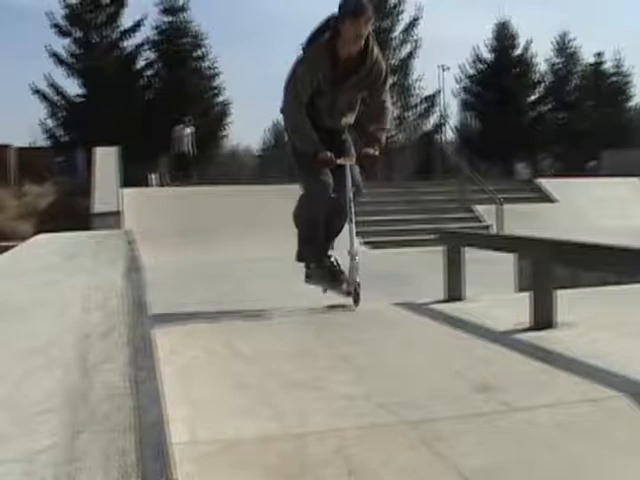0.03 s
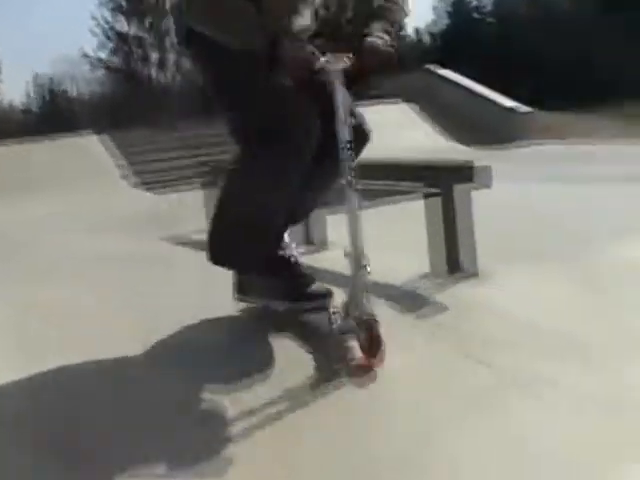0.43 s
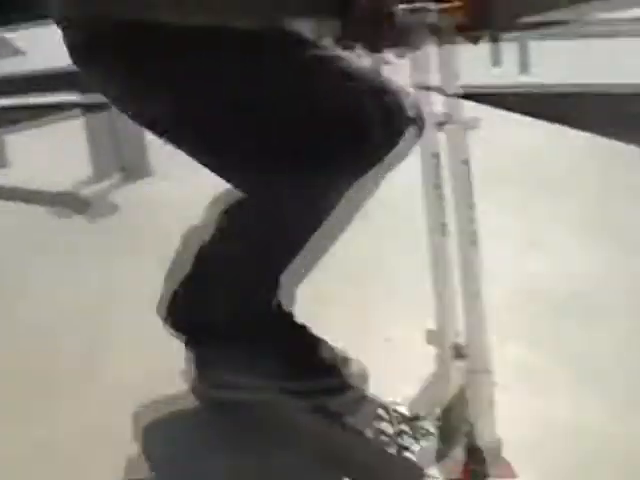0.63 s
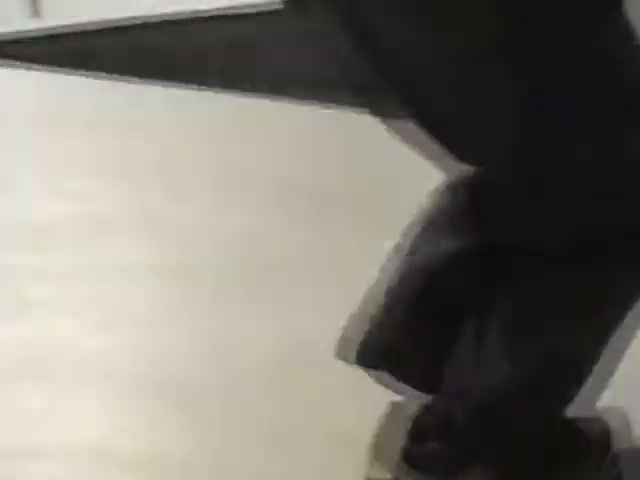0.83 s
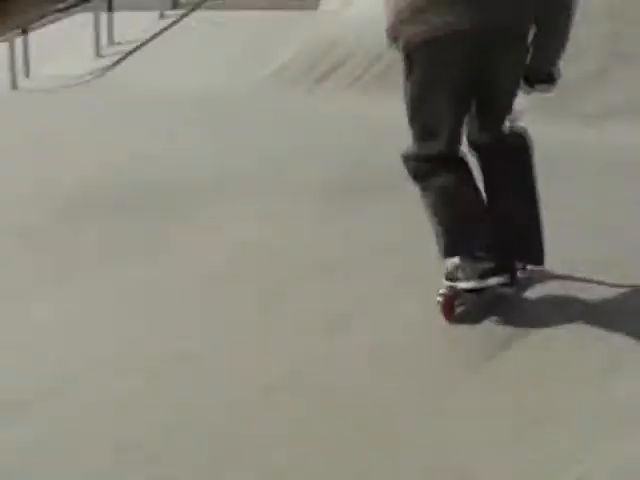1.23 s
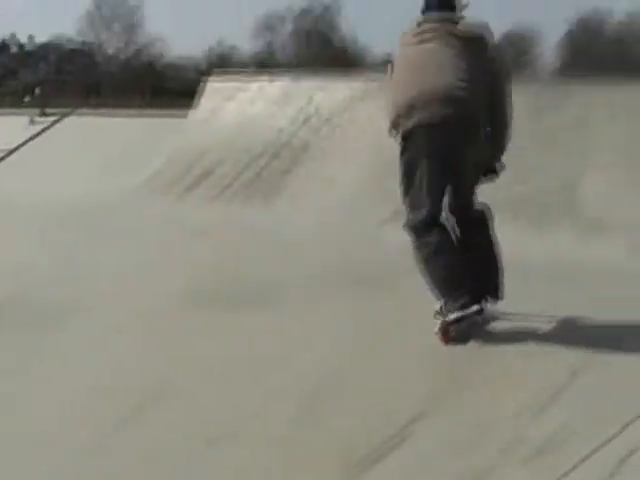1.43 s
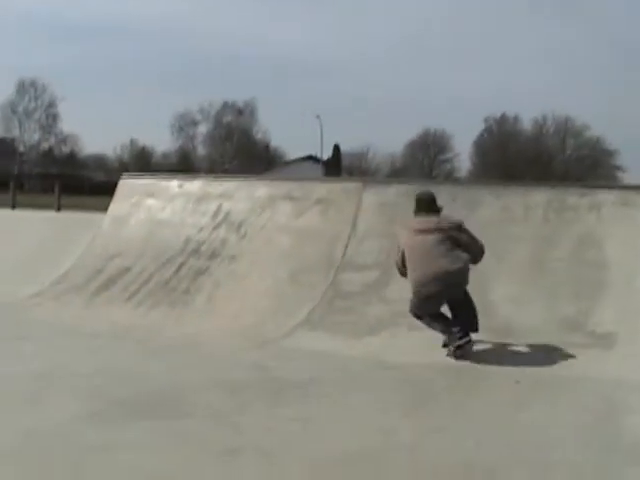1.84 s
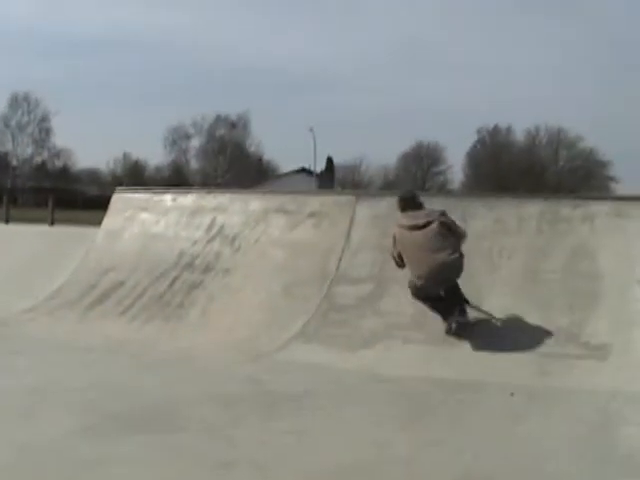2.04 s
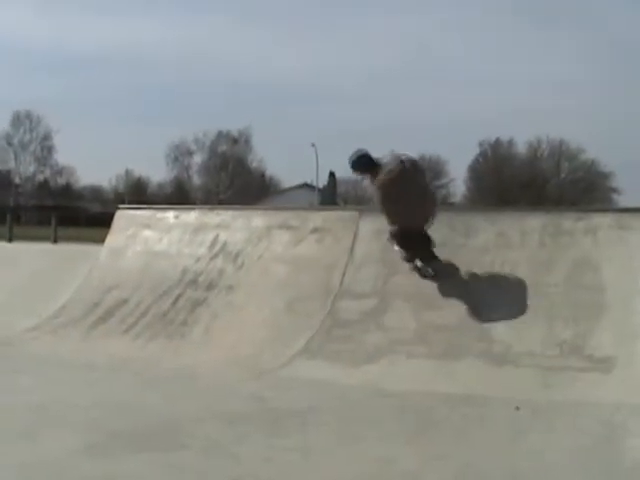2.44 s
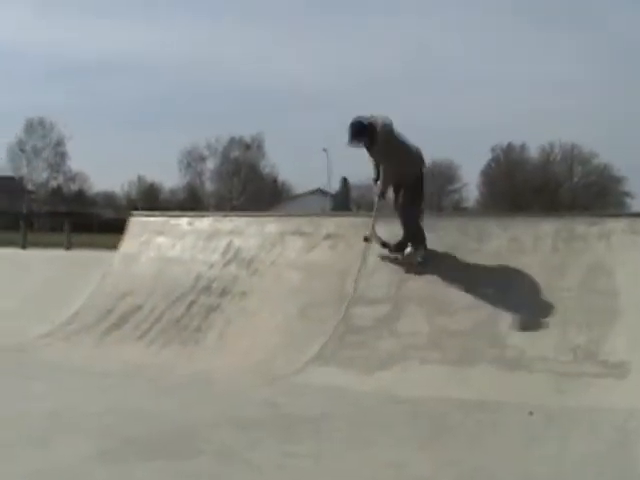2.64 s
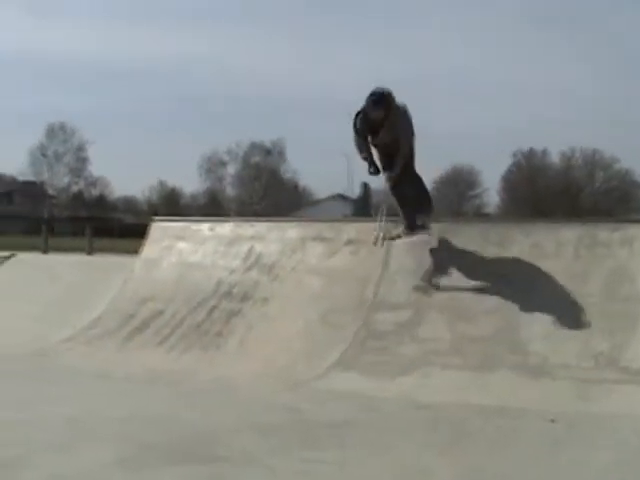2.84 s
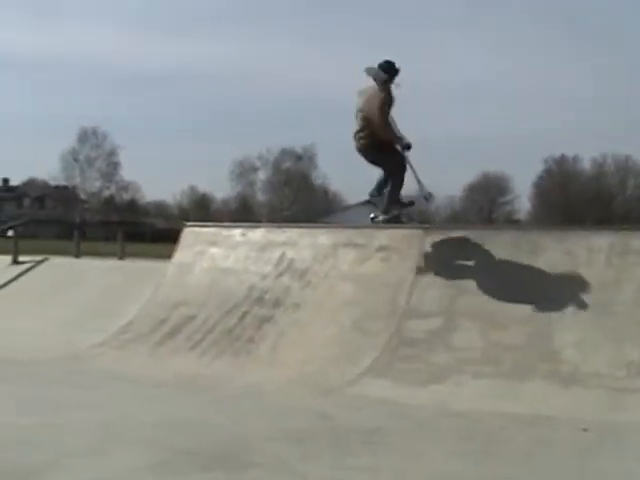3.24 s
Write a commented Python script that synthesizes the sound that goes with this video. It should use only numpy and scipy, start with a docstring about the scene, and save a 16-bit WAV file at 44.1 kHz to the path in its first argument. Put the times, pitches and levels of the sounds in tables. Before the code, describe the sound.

Hard scooter wheels approach and pass right by the microphone with rattles, scuffs and sharp knocks. The rolling dies away and a short metal clatter follows on a ramp, while gusty wind rumbles over faint outdoor skatepark hiss.

```python
"""A concrete skatepark, outdoors, with a stereo microphone standing in the wind.
A kick scooter rolls close past it, loose fittings rattling, hard wheels clacking across the joints.
It runs on up a ramp, clicks off the coping and lands on top with a metallic clatter.
Wind buffets the two microphone ports throughout, over a faint outdoor hiss."""
import sys
import numpy as np
from scipy import signal
from scipy.io import wavfile
from scipy.ndimage import uniform_filter1d

SR = 44100
rng = np.random.default_rng(int(sys.argv[2]) if len(sys.argv) > 2 else 0)


def unload_audio(sound):
    """Save the sound as a 16-bit wav file, at the path given as the first command line argument."""
    columns = np.transpose(np.atleast_2d(sound))
    # keep every value between -1 and 1, then stretch to whole-number steps
    steps = np.round(np.clip(columns, -1, 1) * 32767)
    wavfile.write(sys.argv[1], SR, steps.astype(np.int16))


N = 149940
T = np.arange(N) / SR

# the wheels as heard at the microphone: (time [s], level [dB])
ROLL_LEVEL = [(.17, -38), (.68, -33.5), (.76, -37.5), (.92, -30.5), (1.01, -42.5), (1.12, -41), (1.57, -32),
              (1.82, -43.5), (1.9, -30.5), (1.98, -32.5), (2.12, -59.5), (2.9, -58)]
# their roar away from the close pass: (frequency [Hz], relative density [dB])
ROLL_COLOUR = [(60, 5.5), (200, 4.5), (760, 6.5), (2100, -15), (5000, -38.5), (12500, -41.5), (16000, -68)]
# wheel bearing resonances: (frequency [Hz], width [Hz], gain [dB])
BEARING_MODES = [(11560, 780, 9), (13300, 640, 4)]
# stereo image of sounds from the park: (frequency [Hz], left-right correlation [-1..1])
PARK_LIKENESS = [(100, 0.95), (1000, 0.97), (4000, 0.82), (12000, 0.89)]
PASS_S, PASS_WIDTH_S, PASS_TREBLE_DB, TREBLE_FROM_HZ = 0.85, 0.4, 22.5, 860
WHEEL_RING_HZ, WHEEL_RING_WIDTH_HZ = 725, 330

def rolling():
    """Hard wheels on gritty concrete, brightest close to the microphone; bumps set the wheels ringing hollowly."""
    level_db, = in_time(ROLL_LEVEL)
    nearness = np.exp(-((T - PASS_S) / PASS_WIDTH_S) ** 2)

    def treble_db(hz):
        return PASS_TREBLE_DB * nearness * np.clip(np.log2(hz / TREBLE_FROM_HZ) / 2, 0, 1)
    roar = coloured_noise(ROLL_COLOUR, PARK_LIKENESS, treble_db)
    whirr = from_db(-28) * body(contact_noise(), BEARING_MODES)
    bumps = resonate(random_clicks(per_s=130), WHEEL_RING_HZ, WHEEL_RING_WIDTH_HZ)
    wheel_ring = from_db(-9) * rms_one(resonate(bumps, WHEEL_RING_HZ, WHEEL_RING_WIDTH_HZ))
    grit_db = 2.5 * flutter(rate_hz=64.7)
    return from_db(level_db + grit_db) * (roar + whirr + wheel_ring)


# loose metal parts clicking at close range: (time [s], level [dB])
RATTLES = [(.212, -24.5), (0.23, -26), (0.399, -32.5), (.473, -29), (.548, -31.5), (0.565, -30),
           (.583, -30), (0.598, -24.5), (.668, -23), (0.7272, -26.5), (.752, -22.5), (.781, -27.5),
           (.861, -17.5), (.918, -15.5), (0.947, -19.5), (0.985, -11), (1.048, -24.5), (1.113, -35),
           (1.159, -35.5)]
# resonances of those parts: (frequency [Hz], width [Hz], gain [dB])
FITTING_MODES = [(1820, 1570, 5.5), (3900, 400, 3), (4170, 630, 2), (6600, 770, 3), (7820, 520, 3.5),
                 (9700, 1500, -11.5), (10200, 200, 2), (13500, 4900, -12)]
RATTLE_DECAY_S, RATTLE_TAIL_DB, RATTLE_TAIL_S = .0026, -18, 0.01

def rattles():
    """Loose fittings click briefly, each time with a slightly different colour."""
    clicks = decays([(s, db, RATTLE_DECAY_S) for s, db in RATTLES])
    tails = decays([(s, db + RATTLE_TAIL_DB, RATTLE_TAIL_S) for s, db in RATTLES])
    roll_db, = in_time(ROLL_LEVEL)
    chatter = contact_noise() * (np.hypot(clicks, tails) + ticks(roll_db))
    return body(chatter, FITTING_MODES, vary_db=1.8)


def ticks(roll_db, relative_db=-27, decay_s=0.00067):
    """Envelope of grit setting the fittings ticking at random, stronger as the wheels run louder."""
    jolts = random_clicks(per_s=54) + 1e-18
    envelope = signal.lfilter([1], [1, -np.exp(-1 / (decay_s * SR))], jolts)
    return rms_one(envelope) * from_db(roll_db + relative_db)


# wheels knocking over joints, then a low thump as the nose lands:
# (time [s], pulse peak [dB], pitch [Hz], width [Hz])
WHEEL_KNOCKS = [(0.9112, -8.5, 1130, 320), (.9475, -3.5, 1390, 910), (0.9825, -14, 260, 260),
                (1.273, -14, 540, 305), (1.477, -20.5, 840, 450), (1.6245, -9.5, 674, 187),
                (1.6275, -19.5, 1500, 654), (3.104, -14.5, 273, 164)]
SHUDDER_DB, SHUDDER_DECAY_S = -19.5, 0.014

def knocks():
    """Each blow to a wheel gives one damped knock and a short shudder."""
    out = 0
    for s, db, hz, width in WHEEL_KNOCKS:
        impulse = 1. * (np.arange(N) == int(s * SR))
        pulse = resonate(resonate(impulse, hz, width), hz, width)
        shudder = rms_one(resonate(contact_noise(), hz, hz * 0.32))
        shudder *= decays([(s, SHUDDER_DB, SHUDDER_DECAY_S)])
        out = out + from_db(db) * (pulse / abs(pulse).max() + shudder)
    return out


# past the microphone, wheels meet the ramp, clip the coping and land: (time [s], level [dB], decay [s])
RAMP_STRIKES = [(2.167, -42.5, 0.0075), (2.65, -28, 0.0013), (2.75, -27, 0.0044), (2.755, -18.5, 0.013),
                (2.778, -20, 0.0055)]
# resonances of the scooter's frame: (frequency [Hz], width [Hz], gain [dB])
FRAME_MODES = [(770, 33, 9.5), (1006, 220, 5.5), (1530, 110, 1.5), (1768, 69, 8), (2640, 170, -1),
               (3320, 370, 1), (4440, 1700, -7.5), (9300, 9300, -16)]
FRAME_RING_DB, FRAME_RING_S = -21.5, 0.051
TUBE_HZ, TUBE_DB, TUBE_DECAY_S = 1564, -1.5, 0.018

def landing():
    """Strikes on the ramp clatter the frame; the hardest rings the handlebar tube on one clear note."""
    tails = decays([(s, db + FRAME_RING_DB, FRAME_RING_S) for s, db, _ in RAMP_STRIKES])
    clatter = body(contact_noise() * np.hypot(decays(RAMP_STRIKES), tails), FRAME_MODES)
    hardest_s, hardest_db, _ = max(RAMP_STRIKES, key=lambda strike: strike[1])
    tube = decays([(hardest_s, hardest_db + TUBE_DB, TUBE_DECAY_S)]) * np.sin(2 * np.pi * TUBE_HZ * T)
    return clatter + tube


# wheels scuffing near the microphone: (time [s], level [dB], half length [s])
SCUFFS = [(.266, -19, 0.012), (.629, -19, 0.0047), (.905, -20.5, 0.0042), (1.049, -33, 0.022)]
# rasp of wheel on concrete: (frequency [Hz], relative density [dB])
SCUFF_COLOUR = [(200, -10), (700, 1.5), (1150, 1), (1450, 20.5), (2000, 1), (3200, 3.5), (5000, -6),
                (7500, -1), (11000, -18), (16000, -14)]
# the scooter clinking in the turn: (time [s], level [dB], decay [s])
CLINKS = [(2.271, -45.5, 0.019), (2.304, -40, 0.0093)]

def scuffs():
    """Wheels slip sideways: grainy rasps nearby, short clinks over on the ramp."""
    grain = coloured_noise(SCUFF_COLOUR, PARK_LIKENESS)
    roughness = rms_one(from_db(3.1 * drift(rate_hz=260)))
    ring = rms_one(resonate(contact_noise(), hz=2864, width_hz=56))
    return swells(SCUFFS) * roughness * grain + decays(CLINKS) * (ring + grain)


# reflections off the ramps: (delay [s], gain [dB])
RAMP_ECHOES = [(.006, -16), (0.058, -30)]

def echoes(x):
    """The concrete throws the sound back to the microphone, with the sides swapped."""
    return sum(from_db(db) * np.pad(x[::-1], ((0, 0), (int(delay * SR), 0)))[:, :N]
               for delay, db in RAMP_ECHOES)


# flow over the microphone between buffets: (time [s], level [dB], brightness [dB])
WIND_FLOW = [(.17, -23, 1), (.45, -20, 2), (.59, -21, 4), (.62, -38, -4), (.65, -15.5, 6),
             (.70, -22.5, 5.5), (.73, -42, 1.5), (1.06, -53, -8), (1.13, -27, 0.5), (1.3, -32.5, 3),
             (1.41, -31, -1.5), (1.97, -31, 2), (2.13, -32.5, -4.5), (2.82, -30.5, -4), (3.17, -37, -6.5),
             (3.4, -38.5, -6.5)]
# buffets right on the ports: (time [s], level [dB])
BUFFETS = [(.171, -15.5), (0.446, -15), (1.126, -19), (1.159, -18), (1.182, -19), (1.229, -16),
           (1.273, -15.5), (1.284, -17.5), (1.336, -19.5), (1.663, -19), (1.717, -19.5), (1.732, -19),
           (1.883, -18), (1.977, -22), (2.048, -25.5), (2.098, -23), (2.351, -19.5), (2.376, -18.5),
           (2.766, -18), (2.787, -17.5), (2.841, -20.5), (3.047, -19), (3.107, -18), (3.139, -26),
           (3.337, -26.5)]
# rumble of the turbulence: (frequency [Hz], relative density [dB])
WIND_COLOUR = [(25, -16), (60, -5.5), (130, 3), (280, 2), (650, -7), (1500, -28), (2800, -35.5),
               (4800, -41.5), (6500, -42), (9500, -45), (16000, -45)]
# how alike the two ports hear it: (frequency [Hz], left-right correlation [-1..1])
WIND_LIKENESS = [(40, 0.72), (120, -0.27), (350, -0.14)]
# where brightness acts: (frequency [Hz], multiple of the brightness [ratio])
WIND_TILT = [(50, -2.4), (200, 0), (1100, 2.2), (6000, .7)]
WIND_FLUTTER_DB, WIND_PIVOT_HZ, BUFFET_HALF_S = 2.5, 260, 0.0063
BUFFET_BRIGHTENS, BUFFET_BASS = 0.18, 0.125   # dB per dB above the flow

def wind():
    """Turbulence on the microphone ports; a buffet is louder and brighter than the flow around it."""
    level_db, brightness_db = in_time(WIND_FLOW)
    flow = from_db(level_db)
    unsteadiness = np.clip((-17 - level_db) / 10, .5, 1)   # a strong flow flutters less
    flutter_db = WIND_FLUTTER_DB * unsteadiness * flutter(rate_hz=25.2)
    buffets = swells([(s, db, BUFFET_HALF_S) for s, db in BUFFETS])
    envelope = np.hypot(flow * from_db(flutter_db), buffets)
    excess_db = 20 * np.log10(envelope / flow)
    tilt_db = brightness_db + BUFFET_BRIGHTENS * excess_db
    crackle_db = 4.4 * drift(rate_hz=117)

    def change_db(hz):
        octaves = np.log2(hz / WIND_PIVOT_HZ)
        treble_db = crackle_db * np.clip(octaves / 2, 0, 1)
        bass_db = BUFFET_BASS * excess_db * np.clip(-octaves, 0, 1)
        return tilt_db * at_hz(WIND_TILT, hz) + treble_db + bass_db
    return envelope * evened(coloured_noise(WIND_COLOUR, WIND_LIKENESS, change_db))


# background of the open park: (time [s], level [dB])
HISS_LEVEL = [(2.2, -48.5), (2.92, -48.5), (3.15, -43)]
# its spectrum: (frequency [Hz], relative density [dB])
HISS_COLOUR = [(300, 15), (900, 5), (3500, -8.5), (16000, -25)]

def outdoor_hiss():
    """A faint hiss behind everything, rising a little near the end."""
    level_db, = in_time(HISS_LEVEL)
    return from_db(level_db) * coloured_noise(HISS_COLOUR, PARK_LIKENESS)


def contact_noise(side_db=-15):
    """Fine chatter of two hard surfaces, nearly the same on both sides."""
    mid, side = rng.standard_normal((2, N))
    return mid + from_db(side_db) * side * [[1], [-1]]


def random_clicks(per_s):
    """Clicks of uneven size at random moments."""
    return (rng.random(N) < per_s / SR) * from_db(4.5 * np.minimum(rng.exponential(1, N), 2))


def coloured_noise(colour, likeness, change_db=lambda hz: 0):
    """Half-octave bands of stereo noise whose colour may move while the total power holds."""
    edges = 23.5 * 2 ** (np.arange(20) / 2)
    white = rng.standard_normal((2, 2, N))
    out, power = 0, 0
    for k, (low, high) in enumerate(zip(edges, edges[1:])):
        bandpass = signal.butter(2, [low, high], "band", fs=SR, output="sos")
        mid, side = signal.sosfilt(bandpass, white[k % 2])
        hz = np.sqrt(low * high)
        alike = np.clip(at_hz(likeness, hz), -1, 1)
        gain = from_db(at_hz(colour, hz) + change_db(hz))
        out = out + gain * (np.sqrt(1 + alike) * mid + np.sqrt(1 - alike) * side * [[1], [-1]])
        power = power + gain ** 2 * (high - low) / (SR / 2) * 2
    return out / np.sqrt(power)


def resonate(x, hz, width_hz):
    """One resonance with gain 1 at its peak."""
    r = np.exp(-np.pi * width_hz / SR)
    feedback = [1, -2 * r * np.cos(2 * np.pi * hz / SR), r * r]
    return signal.lfilter(np.array([1, 0, -1]) * (1 - r * r) / 2, feedback, x + 1e-18)


def body(x, modes, vary_db=0):
    """Parallel resonances that keep the power of white noise; each gain wavers by vary_db."""
    power = sum(np.pi * width / SR * from_db(db) ** 2 for _, width, db in modes)
    ringing = sum((-1) ** k * from_db(db + vary_db * flutter(rate_hz=15.9)) * resonate(x, hz, width)
                  for k, (hz, width, db) in enumerate(modes))
    return ringing / np.sqrt(power)


def swells(rows):
    """Bell-shaped envelopes, added in power."""
    return np.sqrt(sum(from_db(db) ** 2 * np.exp(-np.minimum(((T - s) / half) ** 2, 100))
                       for s, db, half in rows))


def decays(rows, attack_s=.0015):
    """Sudden onsets that die away, added in power."""
    power = 0
    for s, db, decay_s in rows:
        onset = np.clip(1 + (T - s) / attack_s, 0, 1) * from_db(db)
        power = power + onset ** 2 * np.exp(-np.clip(2 * (T - s) / decay_s, 0, 100))
    return np.sqrt(power)


def drift(rate_hz):
    """Smooth random wander with rms 1."""
    r = np.exp(-2 * np.pi * rate_hz / SR)
    return rms_one(signal.lfilter([1], [1, -2 * r, r * r], rng.standard_normal(N + SR))[SR:])


def flutter(rate_hz):
    """Quick random wavering with rounded peaks and no slow swell; rms 1."""
    wavering = rms_one(resonate(drift(rate_hz), rate_hz, rate_hz))
    return rms_one(np.tanh(wavering / 2))


def evened(x, samples=700):
    """Take the slow swings out of a noise."""
    return x / np.sqrt(np.maximum(uniform_filter1d(np.mean(x ** 2, axis=0), samples), 1e-12))


def in_time(rows):
    """Each column of a curve at every sample."""
    s, *columns = np.transpose(rows)
    return [np.interp(T, s, column) for column in columns]


def at_hz(points, hz):
    """Read a spectrum on a log-frequency axis."""
    frequencies, values = np.transpose(points)
    return np.interp(np.log(hz), np.log(frequencies), values)


def from_db(db):
    """Decibels to gain."""
    return 10 ** (np.asarray(db) / 20)


def rms_one(x):
    """Scale to rms 1."""
    return x / np.sqrt(np.mean(x ** 2) + 1e-20)


def scene():
    """The scooter and its echoes, wind on the microphone, and the park's hiss behind."""
    hits = scuffs() + rattles() + knocks() + landing()
    hiss = outdoor_hiss()
    return hits + echoes(hits) + rolling() + wind() + hiss


START_S, FADE_IN_S, CUTOFF_HZ = .165, .002, 15850

def record(dry):
    """The microphone's sound starts abruptly; a steep low-pass cuts the highest treble."""
    fade_in = np.clip((T - START_S) / FADE_IN_S, 0, 1)
    lowpass = signal.ellip(10, .2, 80, CUTOFF_HZ, fs=SR, output="sos")
    return signal.sosfilt(lowpass, dry * fade_in)


dry = scene()
out = record(dry)
unload_audio(out)
```